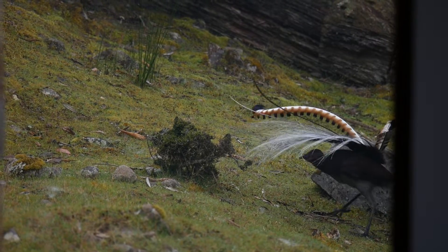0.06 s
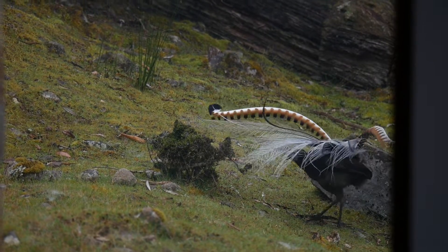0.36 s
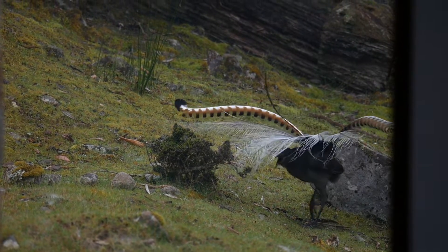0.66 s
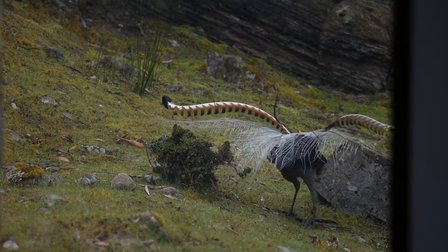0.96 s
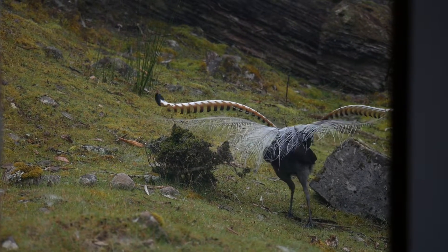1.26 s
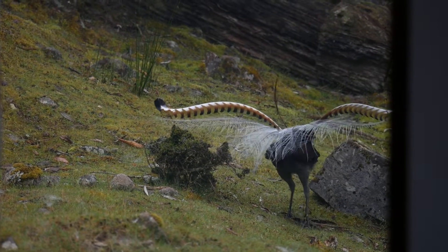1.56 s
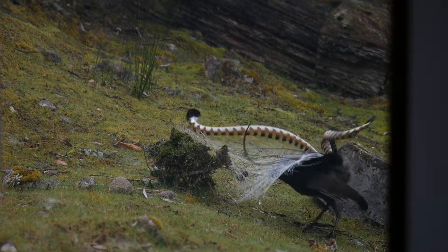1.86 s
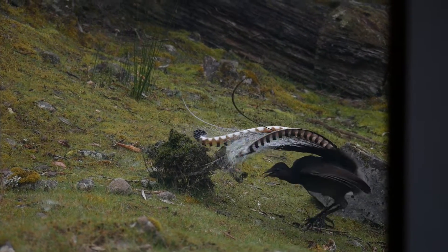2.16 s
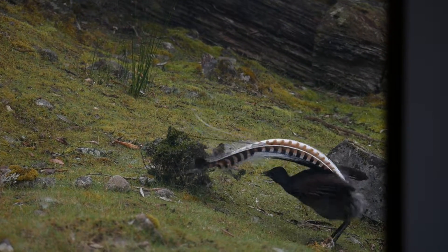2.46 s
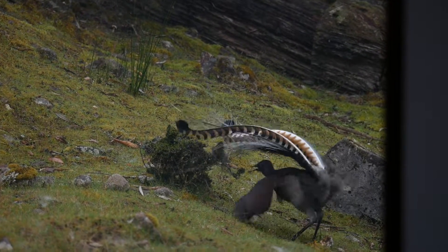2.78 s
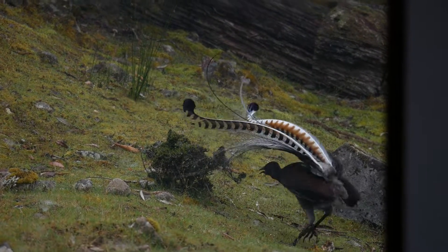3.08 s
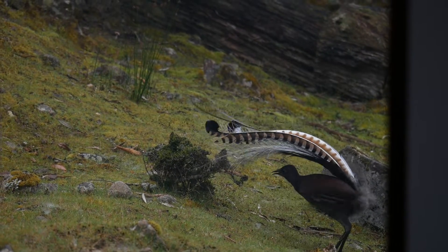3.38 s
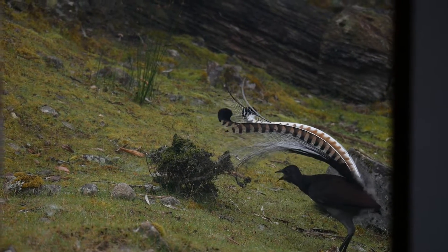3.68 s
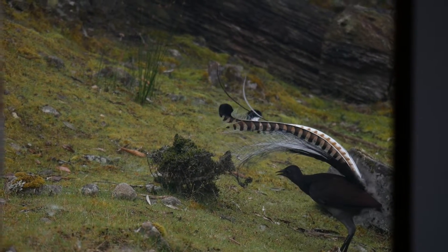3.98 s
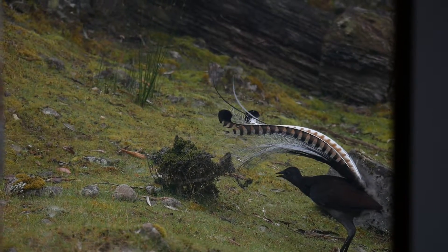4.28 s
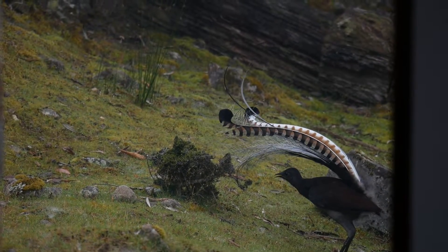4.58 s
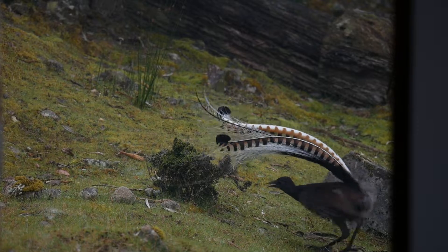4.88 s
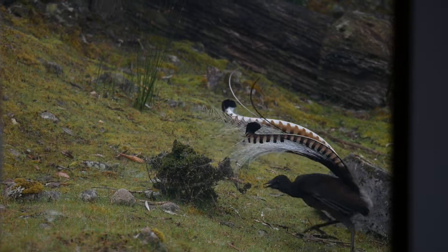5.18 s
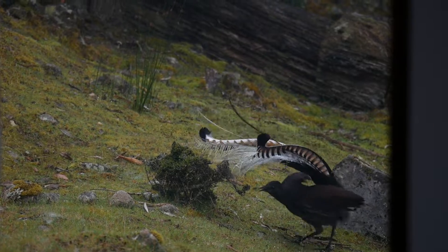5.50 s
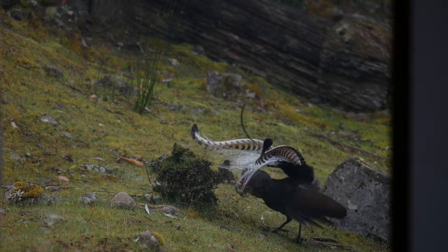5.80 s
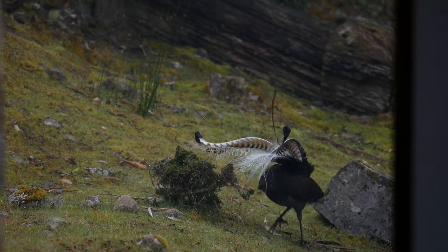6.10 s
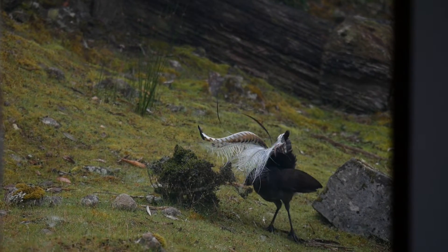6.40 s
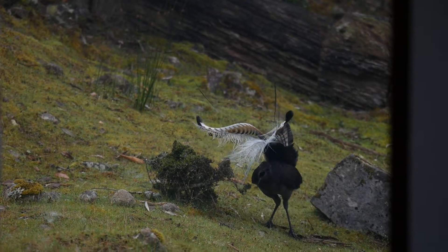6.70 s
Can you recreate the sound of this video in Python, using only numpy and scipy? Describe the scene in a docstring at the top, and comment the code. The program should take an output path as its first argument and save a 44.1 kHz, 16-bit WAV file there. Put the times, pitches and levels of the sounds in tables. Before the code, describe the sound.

A lyrebird gives short, sharp, ringing whistled calls, mostly in pairs, over a quiet hollow hum, faint ticks and soft footfalls.

```python
"""A lyrebird on a forest slope gives sharp calls in pairs, heard from inside a shelter with hard walls.
The bird is a little right of the stereo microphone. Its syrinx sounds a soft low lead-in, then a fast
run of pips that fall in pitch; the walls smear them into one whistle.
Well below the bird lie faint air, a hollow steady hum, small ticks and a few soft footfalls."""
import sys
import numpy as np
from scipy import signal
from scipy.fft import rfft, irfft
from scipy.io import wavfile

SR = 44100
rng = np.random.default_rng(int(sys.argv[2]) if len(sys.argv) > 2 else 0)


def wav_out(sig):
    """Save sig, one row per channel (or a flat mono array), as 16-bit PCM at SR to the path in sys.argv[1]."""
    wavfile.write(sys.argv[1], SR, np.round(np.clip(np.atleast_2d(sig).T, -1, 1) * 32767).astype(np.int16))


N = 302085
TIME = np.arange(N) / SR
BIN_HZ = np.fft.rfftfreq(N, 1 / SR)

# The broad background of the place. Each row: frequency in Hz, level in dB per Hz.
AIR_SPECTRUM = [(20, -104), (50, -99), (75, -99), (140, -88.5), (260, -86), (600, -94.5), (1000, -92),
                (2200, -92), (2850, -105), (4000, -108.5), (7000, -110), (10000, -111), (15000, -115.5)]
# How alike the air is on the two channels. Each row: frequency in Hz, correlation.
AIR_LIKENESS = [(60, -0.54), (290, -0.61), (700, -0.055), (1400, -0.4), (3000, 0.17), (6500, 0.39),
                (15000, 0.16)]
# Hollow resonances of the hum. Each row: centre in Hz, width in Hz, level in dB per Hz,
# left minus right in dB, correlation of the channels before the left is delayed.
HUM_RESONANCES = [(436, 98.5, -84, 5, .1), (715.3, 65, -76, -3, 0.95), (1242, 154, -89.5, 4, 0.14),
                  (1510, 70, -101, -3, .3), (1970, 160, -88.5, 5.5, 0.44), (2274, 84, -83.5, 4.5, 0.35),
                  (2730, 1100, -105.5, 4, .2), (3150, 150, -91.5, -2.5, .2)]
# Small ticks. Each row: start in seconds, level in dB, pitch in Hz.
TICK_EVENTS = [(0.011, -45, 670), (0.232, -51, 2050), (0.291, -50, 600), (0.63, -43, 500),
               (1.795, -43.5, 1230), (2.818, -51, 720), (5.55, -46, 520), (5.717, -53, 1860),
               (5.789, -50, 1830)]
# Footfalls. Each row: start in seconds, thud in dB, thud pitch in Hz, crunch in dB, swish in dB.
FOOTSTEPS = [(0.067, -78, 200, -66, -64), (0.22, -90, 200, -65.5, -69), (0.46, -76, 205, -72, -67),
             (1.921, -58.5, 197, -61.5, -67), (2.363, -57, 194, -66, -76), (2.826, -64, 212, -68.5, -85),
             (3.314, -71, 200, -67, -100), (4.952, -61, 208, -62.5, -80), (5.399, -58.5, 249, -61, -87),
             (5.869, -56, 255, -68.5, -70.5), (6.329, -57.5, 203, -68, -67)]
# First reflections: the earliest off the ground, the rest off the walls. Each row: delay in seconds, left gain,
# right gain.
FIRST_REFLECTIONS = [(.0056, 0.42, 0.98), (0.0105, 0.29, 0.39), (0.0177, 0.29, 0.28), (.0215, 0.66, .2),
                     (.031, 0.82, 0.32)]
# Rings of the shelter. Each row: centre in Hz, width in Hz, level within the tail in dB, t60 in seconds.
SHELTER_RINGS = [(2105, 40, -10.5, 1), (6150, 170, -1, 0.99)]
# Overtones of the syrinx. Each row: multiple of the pitch, relative level in dB.
SYRINX_OVERTONES = [(2, -33), (3, -36.5), (4, -37), (5, -49), (6, -34)]
# Colour that throat and beak give to overtones and rasp. Each row: frequency in Hz, gain in dB.
THROAT_COLOUR = [(800, -9.5), (1600, 2.5), (2300, 13), (3000, 5), (4000, -4.5), (4950, -3.5), (5700, -5),
                 (6300, -7), (7200, -12.5), (8000, -13.5), (9500, -13.5), (15000, -29.5)]
# The bird's calls. Each row: start in seconds, strength in dB, first pitch in Hz, lead-in pitch in Hz.
LYREBIRD_CALLS = [(0.719, -16, 2380, 1330), (1.273, -16, 2387, 1252), (3.704, -24.5, 2461, 1231),
                  (4.265, -22.5, 2446, 1287), (6.747, -17, 2380, 1238)]


def undb(db):
    """Decibels to gain."""
    return 10 ** (np.asarray(db) / 20)


def unit(x):
    """Scale to rms 1."""
    return x / np.sqrt(np.mean(x ** 2))


def over_hz(points):
    """Join (Hz, value) points on a log axis, for every bin of the spectrum."""
    hz, value = np.transpose(points)
    return np.interp(np.log(BIN_HZ + 1), np.log(hz), value)


def resonance(hz, width_hz):
    """Gain of a steep-sided resonance at every bin."""
    f = BIN_HZ + 1
    return 1 / (1 + ((f * f - hz * hz) / (2 * f * width_hz)) ** 2 * 2)


def noise(gain):
    """Noise with the given gain per bin."""
    return irfft(rfft(rng.standard_normal(N)) * gain, N)


def stereo_noise(gain, likeness):
    """Two channels of noise with the given correlation."""
    mid = noise(gain * np.sqrt((1 + likeness) / 2))
    side = noise(gain * np.sqrt((1 - likeness) / 2))
    return np.array([mid + side, mid - side])


def wander(rate_hz):
    """A smooth random curve of rms 1 that moves about rate_hz times a second."""
    return unit(noise(1 / (1 + (BIN_HZ / rate_hz) ** 4)))


def burst(start, rise, t60):
    """An envelope that rises, then loses 60 dB in t60; all times in seconds."""
    age = np.maximum(TIME - start, 0)
    return (1 - np.exp(-age / rise)) * np.exp(-np.minimum(age / t60, 2) * np.log(1000))


def air_and_hum(flicker_db=1.5, flicker_hz=17.4, left_lag_s=0.00035):
    """Smooth air around the microphone, and hollow resonances that each waver and reach the left late."""
    bed = stereo_noise(undb(over_hz(AIR_SPECTRUM)), over_hz(AIR_LIKENESS))
    lag = np.exp(-2j * np.pi * BIN_HZ * left_lag_s)
    for hz, width_hz, db, pan_db, likeness in HUM_RESONANCES:
        left, right = stereo_noise(undb(db) * resonance(hz, width_hz), likeness)
        hum = undb([[pan_db / 2], [-pan_db / 2]]) * [irfft(rfft(left) * lag, N), right]
        bed += hum * undb(flicker_db * wander(flicker_hz))
    return bed * np.sqrt(SR / 2)


def ticks(patter_db=-63, spread_db=10, patter_count=45):
    """Small dull ticks, wide across the channels, with a faint random patter between them."""
    taps = sum(undb(db) * burst(start, .001, t60=.054) * unit(stereo_noise(resonance(hz, hz / 2), 0))
               for start, db, hz in TICK_EVENTS)
    patter = sum(undb(patter_db + spread_db * size) * burst(when * N / SR, .0005, t60=.055)
                 for when, size in rng.random((patter_count, 2)))
    return taps + patter * unit(stereo_noise(resonance(hz=1100, width_hz=1100), 0))


def footfalls(grain_db=2.5, snap_db=9):
    """Each step is a dull thud, a snap that breaks into a grainy crunch, and a softer-edged swish."""
    thud, crunch_level, swish_level = np.zeros((3, N))
    for start, thud_db, thud_hz, crunch_db, swish_db in FOOTSTEPS:
        body = unit(noise(resonance(thud_hz, width_hz=60)))
        thud += undb(thud_db) * burst(start, .0081, t60=.46) * body
        snap = undb(snap_db) * burst(start, .00033, t60=.034)
        crunch_level += undb(crunch_db) * (snap + burst(start, .0036, t60=.94))
        swish_level += undb(swish_db) * burst(start, .011, t60=.88)
    crunch = crunch_level * unit(stereo_noise(resonance(hz=2900, width_hz=810), .75))
    swish = swish_level * unit(stereo_noise(resonance(hz=5800, width_hz=3000), .35))
    return thud + (crunch + swish) * undb(grain_db * wander(200))


def shelter(source, crossover_hz=3500, build_s=.0053, likeness=.7):
    """The microphone takes the direct sound, hard reflections off the ground and walls, then a diffuse, ringing
    tail."""
    low_band = 1 / (1 + (BIN_HZ / crossover_hz) ** 4)
    low_fade = burst(.016, build_s, t60=.55)
    tail = stereo_noise(low_band, likeness) * low_fade
    tail += stereo_noise(1 - low_band, likeness=.75) * burst(.0032, .024, t60=.72)
    for hz, width_hz, db, t60 in SHELTER_RINGS:
        tail += stereo_noise(undb(db) * resonance(hz, width_hz), likeness) * burst(.0049, build_s, t60)
    response = undb([[2.5], [3.5]]) * tail / np.linalg.norm(low_fade)
    response[:, 0] += undb([-5, 1])  # direct sound, a little from the right
    for delay, left, right in FIRST_REFLECTIONS:
        response[:, int(delay * SR)] += [left, right]
    return signal.fftconvolve(source[None], response[:, :SR], axes=1)[:, :N]


def lead_in(age, hz, waver, ahead_s=.036, rise_s=.012, hold_s=.013, release_s=.054, jitter=.0352):
    """A soft, wavering low note that sags just before the pips and dies away under them."""
    phase = 2 * np.pi * np.cumsum(hz * (1 + jitter * waver)) / SR
    corners_s = [-ahead_s, rise_s - ahead_s, 0, hold_s, hold_s + release_s]
    swell = np.interp(age, corners_s, [0, 1, undb(-9), 1, 0])
    return swell * (np.sin(phase) + undb(-18) * np.sin(2 * phase))


def pip(age, hz, half_s, bend):
    """One bell-shaped squeak that bends upward; all start alike, so evenly spaced ones fuse into a tone."""
    x = age / half_s
    bent_age = age + bend * half_s * (np.hypot(x, 1) - 1)
    return np.exp(-x ** 2) * np.sin(2 * np.pi * hz * bent_age)


def pip_edge(age, hz, waver, overtone_db, rasp_db=-32, lag_s=.009, half_s=.014, jitter=.055):
    """Rough overtones and a rasp that trail a pip."""
    phase = 2 * np.pi * np.cumsum(hz * (1 + jitter * waver)) / SR
    overtones = sum(undb(db + overtone_db) * np.sin(k * phase) for k, db in SYRINX_OVERTONES)
    rasp = undb(rasp_db) * rng.standard_normal(len(age))
    return (overtones + rasp) * np.exp(-((age - lag_s) / half_s) ** 2)


def pip_run(count=7, first_s=.0055, gap_s=.027, quickening=.8, fall_at_s=.044, release_at_s=.11):
    """The course of every call: the pips quicken, fall along an S-curve and die away."""
    delay = first_s + gap_s * np.arange(count) ** quickening
    fall = (1 + np.tanh((delay - fall_at_s) / .02)) / 2  # share of the fall, 0 to 1
    gain = (1 - np.tanh((delay - release_at_s) / .011)) / 2
    # In mid-run the pips are shortest and bend upward most.
    tightness = np.exp(-((delay - .056) / .035) ** 2)
    half_s = np.interp(tightness, [0, 1], [.0039, .0015])
    bend = np.interp(tightness, [0, 1], [.022, .14])  # share of the pitch
    return zip(delay, fall, gain, half_s, bend)


def lyrebird(usual_db=-18, usual_first_hz=2414, usual_final_hz=2008.4, pitch_scatter=.011):
    """The syrinx hums a low lead-in, then snaps up about an octave into a falling run of pips."""
    tone, edge = np.zeros((2, N))
    waver = wander(197.5)
    for start, first_db, first_hz, lead_hz in LYREBIRD_CALLS:
        span = abs(TIME - start) < .2
        age = TIME[span] - start
        onset = (1 + np.tanh(age / .0006 - 2)) / 2
        # The ending and the lead-in partly follow the call's own strength; strong calls are brighter.
        effort_db = first_db - usual_db
        final_db = -18.5 + .5 * effort_db
        final_hz = usual_final_hz * (first_hz / usual_first_hz) ** .35
        brightness = undb(.58 * effort_db)
        tone[span] += undb(-44 + .17 * effort_db) * lead_in(age, lead_hz, waver[span])
        for delay, fall, gain, half_s, bend in pip_run():
            hz = (first_hz + (final_hz - first_hz) * fall) * (1 + pitch_scatter * rng.standard_normal())
            level = onset * gain * undb(first_db + (final_db - first_db) * fall)
            overtone_db = np.interp(fall, [0, 1], [4.5, -7])  # ringing overtones give way to rasp
            tone[span] += level * pip(age - delay, hz, half_s, bend)
            edge[span] += level * brightness * pip_edge(age - delay, hz, waver[span], overtone_db)
    return tone + irfft(rfft(edge) * undb(over_hz(THROAT_COLOUR)), N)


def scene():
    """The bird as it arrives inside the shelter, over the quiet surroundings."""
    return shelter(lyrebird()) + air_and_hum() + footfalls() + ticks()


def record(dry, notch_hz=7880, top_hz=15450):
    """The microphone has one narrow notch in the treble; the recorder cuts the top."""
    notched = signal.lfilter(*signal.iirnotch(notch_hz, Q=45, fs=SR), dry)
    return signal.sosfilt(signal.ellip(10, .2, 70, top_hz, fs=SR, output="sos"), notched)


dry = scene()
out = record(dry)
wav_out(out)
```